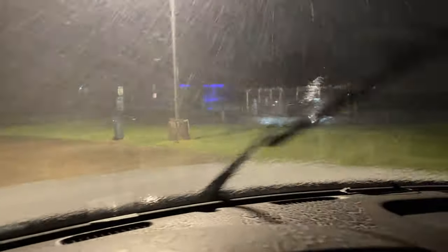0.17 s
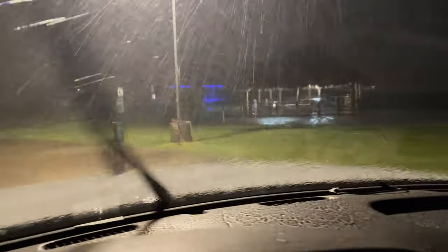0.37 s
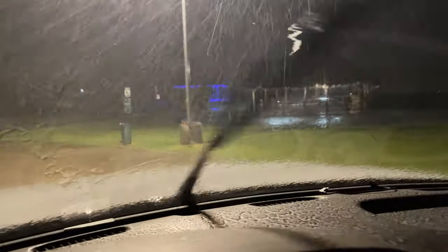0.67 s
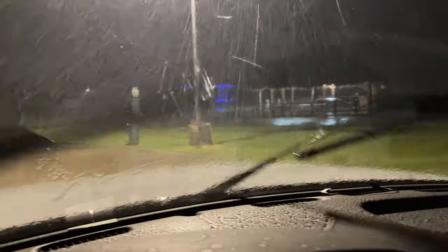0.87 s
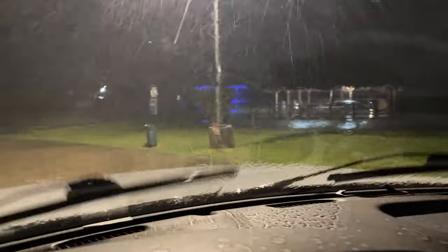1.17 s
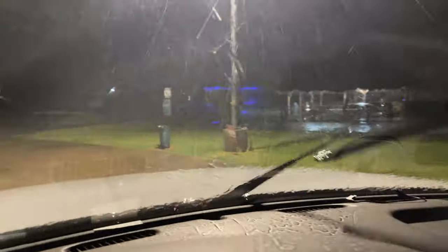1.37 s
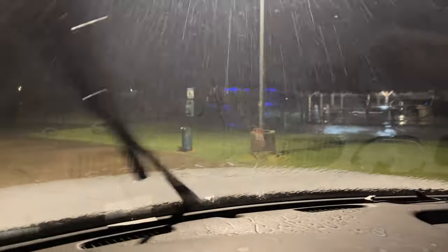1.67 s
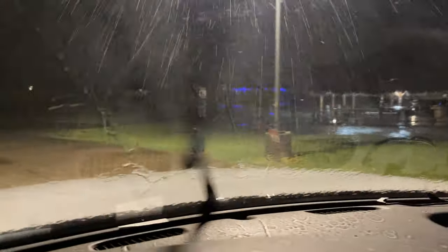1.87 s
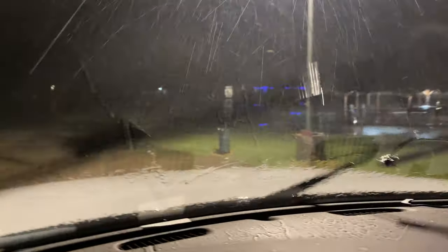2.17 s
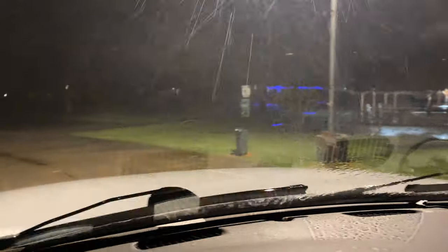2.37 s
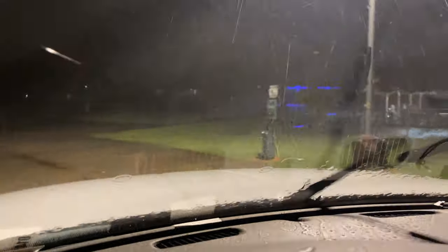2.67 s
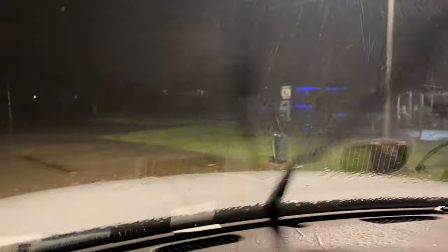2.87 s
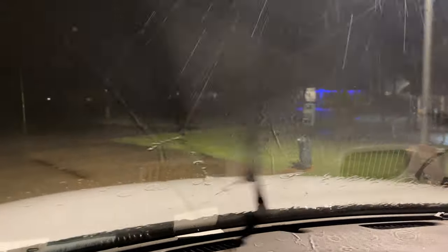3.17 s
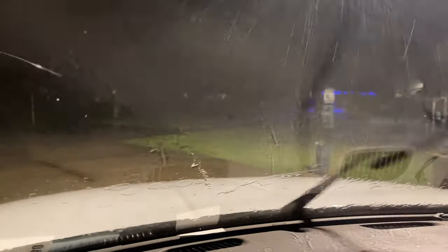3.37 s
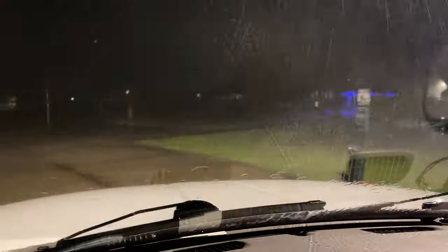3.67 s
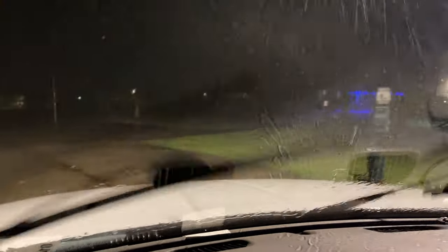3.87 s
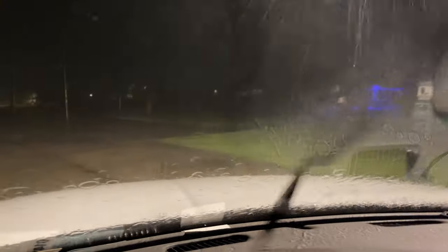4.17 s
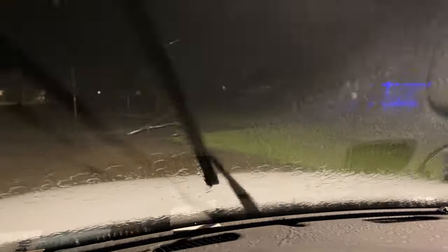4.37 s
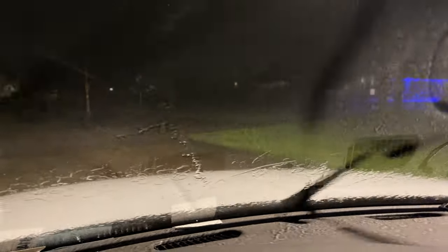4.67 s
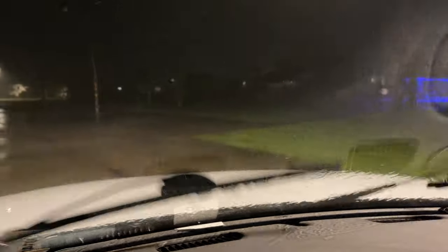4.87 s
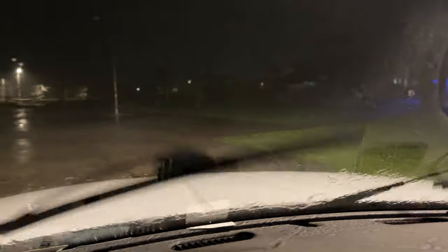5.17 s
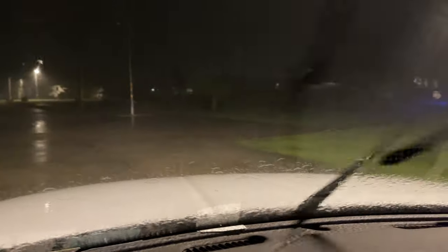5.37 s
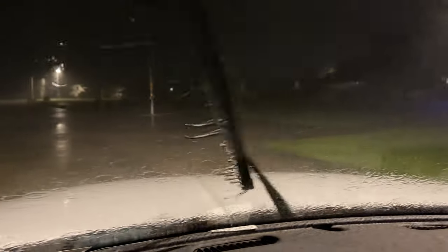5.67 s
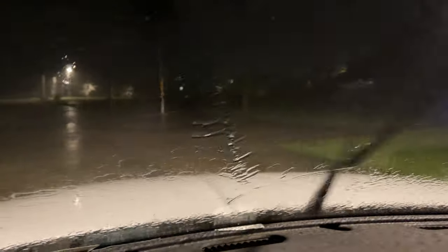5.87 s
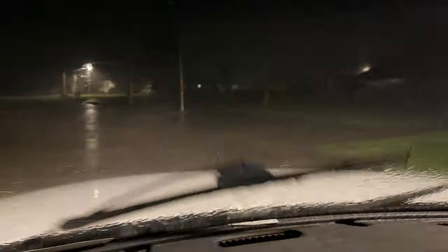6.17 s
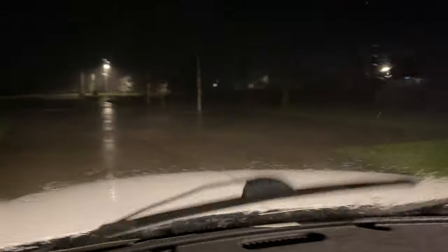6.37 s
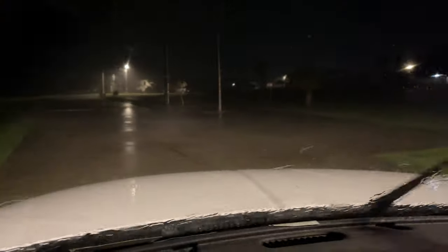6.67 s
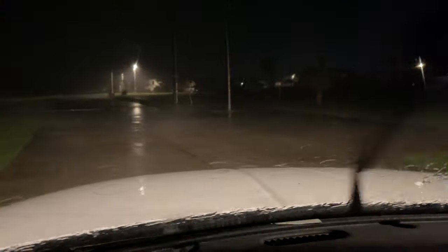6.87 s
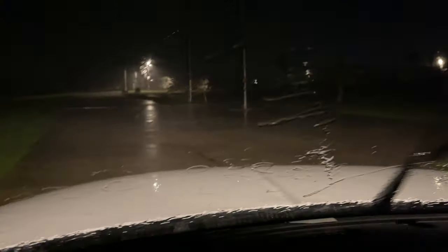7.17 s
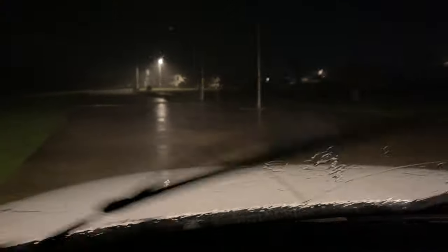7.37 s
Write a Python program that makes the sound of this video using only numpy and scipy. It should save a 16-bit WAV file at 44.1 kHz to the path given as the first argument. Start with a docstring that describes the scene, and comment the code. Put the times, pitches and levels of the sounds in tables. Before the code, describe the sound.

From just behind the windscreen of a car creeping through a storm, gusts of rain patter brightly on the glass and drum dully on the roof. Wipers thump and judder back and forth over a low engine drone, wind rumble and a faint pulsing whine. After a short lull the rain builds again in surges, with single big drops cracking on the glass and heavier wiper thuds.

```python
"""Front seat of a car creeping through a night storm, a stereo microphone close behind the windscreen.
From the start the engine booms just above idle, beating with buffets of wind, while gusts throw rain
at glass and roof and the wipers thud at each turn. A faint, throbbing belt whine rises by 2 s.
Near 3 s the rain lulls over the rumble of wind and tyres and a thin whistle of air.
From 4 s it builds again in sheets and heavy drops, and the wipers land their hardest blows."""
import sys
import numpy as np
from scipy import signal
from scipy.fft import rfft, irfft
from scipy.io import wavfile

SR = 44100
rng = np.random.default_rng(int(sys.argv[2]) if len(sys.argv) > 2 else 0)


def wav_record(signal):
    """Record a signal, one row per channel, as 16-bit PCM in the file named by sys.argv[1]."""
    frames = np.transpose(np.atleast_2d(signal))
    bounded = np.clip(frames, -1, 1)
    # unit amplitude maps onto the largest positive 16-bit level
    quanta = np.round(bounded * 32767).astype(np.int16)
    wavfile.write(sys.argv[1], SR, quanta)


N = 332514
TIME = np.arange(N) / SR

# The body shell. Each row: time in seconds, base level of its rumble in dB, of rain on the roof in dB.
SHELL_LEVELS = [(0, -31, -37.5), (.2, -27, -36), (.45, -28.5, -39.5), (1.7, -27, -38.5), (3, -27, -37.5),
                (4.2, -27, -39.5), (5.2, -28.5, -40.5), (6.1, -28.5, -40.5), (7.54, -27, -38)]
# Tone colours from the front seat. Each row: frequency in Hz, relative spectral level in dB.
RUMBLE_SPECTRUM = [(20, -40), (35, -47), (55, 3), (75, -1), (95, -3.5), (130, 4), (175, -9.5), (225, -3.5),
                   (275, -15), (330, -7.5), (420, -23), (800, -30.5), (3000, -74), (12000, -90)]
WHISTLE_SPECTRUM = [(4700, -50), (4920, -2), (5050, 0), (5200, -12), (5400, -50)]
ROOF_SPECTRUM = [(100, -10), (250, -0.5), (500, 0.5), (900, -2.5), (1500, -7), (2400, -14.5), (4000, -19.5),
                 (11000, -38), (12400, -62)]
GLASS_SPECTRUM = [(200, 11.5), (600, 3), (1200, 4), (1800, 2), (2500, 5), (3700, 2), (4700, -1.5),
                  (5700, -1), (6800, -6), (8200, -4), (10700, -2), (11600, -6.5), (12400, -24),
                  (13200, -46)]
RUBBER_SPECTRUM = [(100, -37), (170, -3), (250, -1), (340, -3), (420, -11), (600, -21), (1200, -29),
                   (4000, -80)]
VALVE_SPECTRUM = [(150, -15), (350, -5), (520, -8.5), (750, 1), (900, -12), (1100, -9.5), (1400, -7.5),
                  (1800, -16.5), (2600, -15), (3500, -29), (7000, -31), (11600, -36), (12400, -62)]
# The slow swell of rain on the glass. Each row: time in seconds, relative strength in dB.
STORM_SWELL = [(0, -36.5), (.17, -40), (.35, -45.5), (1.1, -44.5), (1.8, -53), (2.1, -50.5), (2.7, -57),
               (3.08, -73.5), (3.28, -53.5), (3.96, -53.5), (4.1, -43), (4.85, -48), (5.35, -41),
               (5.58, -45), (6.15, -40.5), (6.65, -43.5), (7.05, -45.5), (7.54, -50)]
# Sheets of rain. Each row: start in seconds, length in seconds, dB above the swell (negative is a gap).
RAIN_SHEETS = [(0.558, 0.23, 5.5), (0.894, 0.174, 5), (1.196, 0.092, 5), (3.312, 0.09, 4), (4.336, 0.16, 4),
               (5.643, 0.16, 5), (5.812, 0.14, 3), (5.935, 0.03, -11.5), (6.075, 0.12, 5),
               (6.748, 0.21, 5.5), (6.937, 0.21, 3)]
# Heavy drops on the windscreen. Each row: time in seconds, relative peak in dB.
HEAVY_DROPS = [(0.3304, -21.5), (0.5493, -21), (0.842, -21), (1.924, -27), (2.067, -23.5), (2.158, -27),
               (2.813, -31), (3.8645, -25.5), (4.0116, -23.5), (4.17, -21), (4.7548, -19.5), (5.3043, -25),
               (5.3886, -17.5), (5.8316, -24), (5.9612, -21), (5.9852, -16), (7.0234, -18)]
# Ringing of windscreen and cowl. Each row: frequency in Hz, relative level in dB, seconds to fall 60 dB.
COWL_MODES = [(125.1, 7.5, 0.17), (148.8, 3, 0.27), (242, -27, 0.084)]
# Wiper cycles, from the top. Each row: start in seconds, dB added to the thuds, dB added to the judder.
WIPER_CYCLES = [(0.529, -1.5, 0.5), (1.823, -2, 0), (3.144, -1, 1), (4.44, -2.5, 1), (5.74, 4.5, 2),
                (7.065, 2.5, 0.5)]
# The blades flip at the top, land at the bottom and set off again.
# Each row: share of the cycle, base thud peak in dB, base judder level in dB, judder length in seconds.
WIPER_TURNS = [(0, -14.5, -24.5, 0.032), (0.392, -26.5, -24.5, 0.071), (0.513, -17.5, -23.5, 0.066)]
# The belt's whine. Each row: time in seconds, centre pitch in Hz, relative level in dB.
BELT_WHINE = [(0, 1417, -62), (1.2, 1426, -44), (2.1, 1415, -37.5), (4.2, 1398, -39), (5.3, 1426, -39),
              (6.1, 1456, -39), (7.54, 1485, -36.5)]
# Wind buffets. Each row: start in seconds, length in seconds, offset from the boom in Hz, relative dB.
WIND_BUFFETS = [(0.021, 0.675, -4.5, -20.5), (0.612, 0.54, -4, -24), (1.705, 0.19, -2, -21.5),
                (2.611, 0.723, 4.5, -20), (5.172, 0.406, 0.5, -17), (5.94, 0.17, -2, -22.5),
                (6.446, 0.16, 1, -22), (6.57, 0.775, 4.5, -23)]
# Engine speed. Each row: time in seconds, firing rate in Hz.
FIRING_RATE = [(0, 38.3), (1, 38.4), (3.1, 38.2), (4.4, 38.45), (5.2, 38.8), (5.8, 38.5), (6.1, 38),
               (7.54, 38)]
# The throb at the firing rate. Each row: time in seconds, relative level in dB.
THROB_LEVEL = [(0.1, -30), (3.0, -28.5), (5.22, -30.5), (5.59, -36), (5.91, -30), (7.45, -28.5)]
# Resonances of the engine bay. Each row: centre in Hz, width in Hz, boost in dB.
BAY_RESONANCES = [(483, 55, 9), (613.7, 19, 10), (747, 62, 2), (955, 75, 11), (1119, 39, 9.5),
                  (1245, 15, 10.5), (1570, 140, 5), (2200, 38, 6)]
# How alike the cabin sounds at the two microphones. Each row: frequency in Hz, likeness from 0 to 1.
MIC_LIKENESS = [(60, 0.93), (140, 0.9), (300, 0.83), (550, 0.23), (1100, 0.27), (1700, 0.045), (2500, 0.46),
                (4000, 0.72), (6500, 0.51), (8500, 0.87), (10000, 1)]
# Balance of the pair. Each row: frequency in Hz, left minus right in dB.
MIC_BALANCE = [(80, -1), (160, 4), (260, -1.5), (420, 2.5), (1100, -1), (1800, -2), (2900, 1.5), (4700, 3),
               (7700, 2), (9000, 0)]
# Phase between the microphone ports. Each row: frequency in Hz, lead of the left in radians.
MIC_PHASE_LEAD = [(1800, 0), (2800, .7), (7500, .75), (8600, 0), (9400, -1.4), (10250, -np.pi),
                  (11100, -4.7), (12100, -2 * np.pi)]


def from_db(db):
    """Decibels to gain."""
    return 10 ** (np.asarray(db) / 20)


def unit(x):
    """Scales to rms 1."""
    return x / np.sqrt(np.mean(x ** 2) + 1e-20)


def follow(rows, column=1):
    """One column of a timed table, at every sample."""
    rows = np.asarray(rows)
    return np.interp(TIME, rows[:, 0], rows[:, column])


def across(points, hz):
    """Reads a spectrum on a log-frequency axis."""
    point_hz, value = np.transpose(points)
    return np.interp(np.log(hz + 1), np.log(point_hz), value)


def drift(rate_hz):
    """Slow random wander of rms 1."""
    hz = np.fft.rfftfreq(N, 1 / SR)
    return unit(irfft(rfft(rng.standard_normal(N)) * (hz > 0) / (1 + (hz / rate_hz) ** 4), N))


def add(mix, start_s, sound):
    """Mixes a stereo sound in at its start time."""
    part = mix[:, max(round(start_s * SR), 0):][:, :sound.shape[1]]
    part += sound[:, :part.shape[1]]


def cabin(pair, spectrum, resonances=()):
    """Colours two unrelated signals and blends them as the cabin does at the two microphones; rms 1."""
    size = pair.shape[1]
    hz = np.fft.rfftfreq(size, 1 / SR)
    peaks_db = sum(db / (1 + (2 * (hz - centre) / width) ** 2) for centre, width, db in resonances)
    common, apart = rfft(pair) * from_db(across(spectrum, hz) + peaks_db)
    likeness = np.clip(across(MIC_LIKENESS, hz), 0, 1)
    mid, side = common * np.sqrt(1 + likeness), apart * np.sqrt(1 - likeness)
    return unit(irfft([mid + side, mid - side], size))


def shell_rumble():
    """All around, wind and wet tyres shake the body shell, with a thin, steady whistle of air."""
    shake_db = follow(SHELL_LEVELS) + 1.46 * drift(rate_hz=9.8)
    shake = from_db(shake_db) * cabin(rng.standard_normal((2, N)), RUMBLE_SPECTRUM)
    whistle = from_db(-66) * cabin(rng.standard_normal((2, N)), WHISTLE_SPECTRUM)
    return shake + whistle


def gusts():
    """Strength of the rain in dB: the slow swell of the storm, single sheets and random flurries."""
    skew = 0.57  # below 1, a sheet arrives faster than it drains
    sheets_db = sum(db * np.sin(np.pi * np.clip((TIME - start_s) / length_s, 0, 1) ** skew)
                    for start_s, length_s, db in RAIN_SHEETS)
    return follow(STORM_SWELL) + sheets_db + 0.94 * drift(rate_hz=14)


def tap(crack_s, echo_db, echo_s, ring_db):
    """One drop: a sharp crack, short reflections off the dashboard, and a ping of the spot it hits."""
    t = np.arange(2048) / SR
    fade = np.exp(-t / crack_s) + from_db(echo_db) * np.exp(-t / echo_s)
    burst = unit(fade * rng.standard_normal((2, len(t))))
    ping_hz = 1800 * 5 ** rng.random()
    ping = unit(np.exp(-t / 0.0055) * np.sin(2 * np.pi * (ping_hz * t + rng.random((2, 1)))))
    return unit(burst + from_db(ring_db) * ping)


def shower(per_s, spread_db, spots=32, **tap_shape):
    """Drops of random size land on many spots, each with a tap of its own."""
    lands = rng.random(N) < per_s / SR
    sizes = lands * from_db(spread_db * np.minimum(rng.exponential(1, N), 4.5))
    spot = rng.integers(0, spots, N)
    return sum(signal.oaconvolve((sizes * (spot == k))[None], tap(**tap_shape), axes=1)[:, :N]
               for k in range(spots))


def rain():
    """Gusts bring more, louder, brighter drops to the glass ahead; overhead the lined roof drums dully."""
    gust_db = gusts()
    surge_db = gust_db - np.mean(gust_db)
    density = from_db(.5 * surge_db)
    patter = shower(1100 * density, spread_db=3.4, crack_s=.0005, echo_db=-7, echo_s=.006, ring_db=-12)
    # hard hits close by: fewer, shorter and brighter; they fade first in a lull
    hits = shower(170 * density, spread_db=4, crack_s=.0005, echo_db=-13, echo_s=.005, ring_db=-18)
    ticks = unit(np.gradient(hits, axis=1)) * from_db(-9.5 + 0.55 * np.minimum(surge_db, 3))
    glass = cabin((unit(patter) + ticks) / np.sqrt(density), GLASS_SPECTRUM) * from_db(gust_db + 5.5)
    drumming = shower(1400, spread_db=2.5, crack_s=.0024, echo_db=-8.5, echo_s=.011, ring_db=-9)
    roof_db = follow(SHELL_LEVELS, column=2) + 0.52 * surge_db
    return glass + cabin(drumming, ROOF_SPECTRUM) * from_db(roof_db)


def splats():
    """Single heavy drops strike the glass near the microphones and stand out of the patter."""
    out, lead_samples = np.zeros((2, N)), 128
    for start_s, peak_db in HEAVY_DROPS:
        hit = tap(crack_s=.0007, echo_db=-12, echo_s=.004, ring_db=-16)
        hit = hit + np.diff(hit, prepend=0)  # a close hit keeps its treble
        drop = cabin(np.pad(hit, ((0, 0), (lead_samples, 0))), GLASS_SPECTRUM)
        add(out, start_s - lead_samples / SR, from_db(peak_db + 1.5) * drop / abs(drop).max())
    return out


def wipers():
    """An arm's length away, three times a cycle, the arms thud on the glass and the rubber judders."""
    out, t = np.zeros((2, N)), np.arange(SR // 4) / SR
    rings = sum(from_db(db - 60 * t / t60) * np.sin(2 * np.pi * hz * t) for hz, db, t60 in COWL_MODES)
    thud = rings * (1 - np.exp(-t / 0.008)) ** 2  # the rubber cushions the blow
    thud /= abs(thud).max()
    periods = np.diff([start_s for start_s, *_ in WIPER_CYCLES])
    for (start_s, weight_db, grip_db), period in zip(WIPER_CYCLES, [*periods, periods[-1]]):
        for share, thud_db, judder_db, length_s in WIPER_TURNS:
            press = np.minimum(t / 0.0054, 1) * np.exp(-np.maximum(t - 0.67 * length_s, 0) / 0.022)
            rubber = cabin(rng.standard_normal((2, len(t))), RUBBER_SPECTRUM)
            judder = unit(press * rubber) * np.sqrt(np.mean(press ** 2))
            blow = from_db(thud_db + weight_db) * thud + from_db(judder_db + grip_db) * judder
            add(out, start_s + share * period, blow)
    return out


def belt_whine(firing_angle):
    """Up front the belt swells once an engine cycle, sliding upward, and every firing shakes its pitch."""
    cycle_angle = firing_angle / 6
    singing = np.clip(.9 - np.cos(cycle_angle), .25, 1)
    pitch_hz = follow(BELT_WHINE) - 12 * np.sin(cycle_angle) + 34 * np.cos(firing_angle)
    jitter_hz = 10 * np.array([drift(rate_hz=53.3) for _ in range(2)])  # one for each microphone
    tone = np.cos(2 * np.pi * np.cumsum(pitch_hz + jitter_hz, axis=1) / SR)
    return from_db(follow(BELT_WHINE, column=2) - 2) * singing * tone


def wind_buffets(boom_angle):
    """Wind buffets the cabin into low hums that start in step with the boom, then beat with it and sag."""
    attack_s, release_s, sag_db_per_s = 0.081, 0.063, 6
    out = np.zeros(N)
    for start_s, length_s, offset_hz, db in WIND_BUFFETS:
        age = np.maximum(TIME - start_s, 0)
        swell = np.minimum(age / attack_s, 1) * np.clip(1 - (age - length_s) / release_s, 0, 1)
        hum = np.cos(boom_angle + 2 * np.pi * offset_hz * age)
        out += swell * from_db(db - sag_db_per_s * age) * hum
    return out


def engine():
    """Six cylinders beyond the dashboard: pressure pulses fill the cabin, valves clatter, a belt sings."""
    firing_angle = 2 * np.pi * np.cumsum(follow(FIRING_RATE)) / SR
    throb = from_db(follow(THROB_LEVEL) + 0.9) * np.cos(firing_angle)
    boom = from_db(-22.5 + 1.84 * drift(rate_hz=6)) * np.cos(2 * firing_angle)
    drone = from_db(-34 + 0.78 * drift(rate_hz=2.4)) * np.cos(3 * firing_angle)
    pulses = -np.sqrt(2) * (throb + boom + wind_buffets(2 * firing_angle) + drone)
    # the two cylinder banks alternate, so the clatter also beats at half orders
    beat = 1 + sum(depth * np.cos(order * firing_angle)
                   for order, depth in [(.5, .17), (1, .25), (1.5, .11), (2, .12)])
    clatter = from_db(-38) * beat * cabin(rng.standard_normal((2, N)), VALVE_SPECTRUM, BAY_RESONANCES)
    return pulses + clatter + belt_whine(firing_angle)


def scene():
    """Everything heard from the front seat."""
    return rain() + splats() + engine() + shell_rumble() + wipers()


def record(dry):
    """Two microphone ports of slightly different resonance, then a band limit at 13 kHz."""
    hz = np.fft.rfftfreq(N, 1 / SR)
    tilt = from_db(across(MIC_BALANCE, hz) / 2)
    left_lead = np.exp(1j * across(MIC_PHASE_LEAD, hz))
    ports = irfft(rfft(dry) * [tilt * left_lead, 1 / tilt], N)
    lowpass = signal.firwin(255, 13000, window=("kaiser", 9), fs=SR)
    return signal.oaconvolve(ports, lowpass[None], "same")


dry = scene()
out = record(dry)
wav_record(out)
```